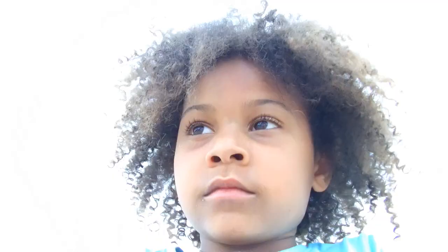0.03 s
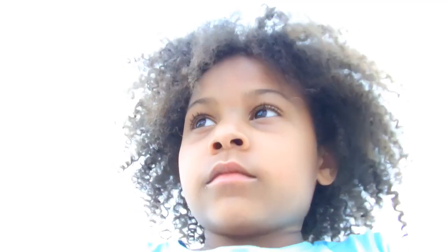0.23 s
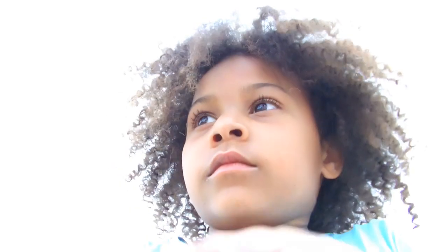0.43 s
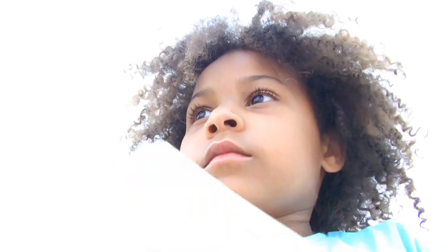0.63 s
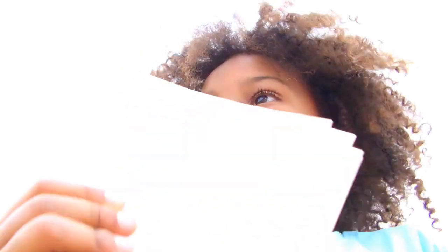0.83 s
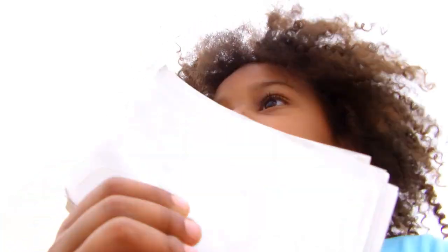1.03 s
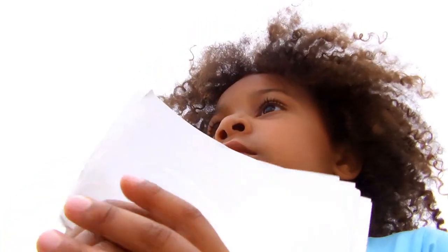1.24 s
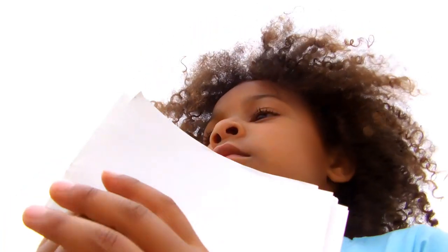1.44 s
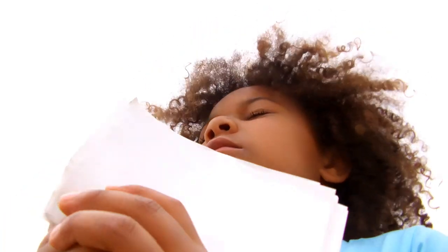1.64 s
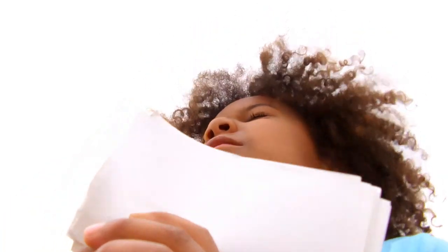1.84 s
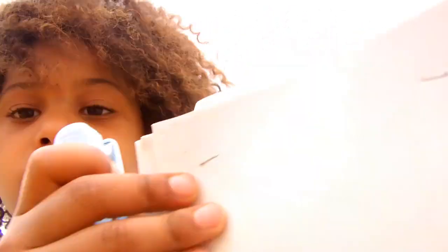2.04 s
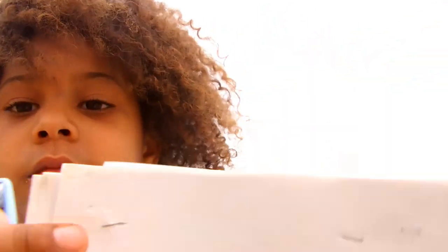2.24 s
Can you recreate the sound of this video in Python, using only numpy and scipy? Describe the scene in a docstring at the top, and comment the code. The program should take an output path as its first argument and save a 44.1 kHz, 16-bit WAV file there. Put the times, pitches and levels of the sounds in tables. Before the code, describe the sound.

The scene is outdoors with no echo, and a faint hum of far traffic runs throughout. Right at the start, a stack of paper flaps, crackles and knocks close to the microphone, then the sheets slide with a soft hiss that fades by about 1 second. A few very faint, thin bird whistles come between 0.5 and 1.5 seconds. At about 1.25 seconds there is a light knock on the stack with tiny paper ticks. At about 1.55 seconds a mini stapler is pressed once: a sharp, dry snap, the loudest sound, followed almost instantly by a smaller one as the staple folds. Another light knock comes near 1.75 seconds. From 2.1 seconds to the end, around 2.3 seconds, the sheets slide, tick and tap again, while soft, dull handling bumps and a low rumble reach the microphone, mostly on the left.

```python
"""Outdoors, with no walls to echo, far traffic hums and a few faint birds whistle.
Close to the microphone, sheets of paper flap, tick and slide under the fingers (buckling and
stick-slip friction), and handling bumps the casing. A mini stapler is pressed once through the stack:
a sharp snap as the staple pierces, then a smaller one as it folds. Each snap excites the damped
modes of the frame and of the stack, and tears paper fibres."""
import sys
import numpy as np
from scipy import signal
from scipy.fft import rfft, irfft, next_fast_len
from scipy.io import wavfile
from scipy.ndimage import uniform_filter1d

SR = 44100
rng = np.random.default_rng(int(sys.argv[2]) if len(sys.argv) > 2 else 0)


def unload_wav(signal):
    """Save mono or channel-first audio to the path in sys.argv[1] as 16-bit WAV at rate SR, clipped to [-1, 1]."""
    wavfile.write(
        sys.argv[1],
        SR,
        np.round(np.clip(np.atleast_2d(signal).T, -1, 1) * 32767).astype(np.int16),
    )


N = 105354
T = np.arange(N) / SR
HIT_T = T[:4096]  # time axis of one impact

# spectrum of far traffic: f/Hz, level/dB
TRAFFIC_SPECTRUM = [(15, -58), (25, -20.5), (55, -16), (262, -22), (343, -21.5), (417, -19), (471, -20),
                    (532, -16), (632, -13), (697, -8.5), (1010, -2.5), (2370, -19), (6000, -28.5),
                    (7480, -34), (8660, -53), (11300, -73), (19100, -120)]
# its stereo width: f/Hz, side minus mid level/dB
TRAFFIC_WIDTH = [(60, -14), (180, -12.5), (350, -3.5), (950, -14.5), (1600, -8.5), (2800, -3.5),
                 (6000, 0.5)]
# bird whistles: t/s, duration/s, level/dB is last, after start f/Hz and end f/Hz
WHISTLES = [(0.463, 0.12, 5080, 5080, -61), (0.861, 0.1, 2920, 2850, -57), (0.898, .09, 4120, 3960, -68.5),
            (1.359, 0.14, 1772, 1676, -56), (1.434, 0.084, 2920, 2880, -62.5)]
# fingers shifting on the casing: t/s, duration/s, level/dB, release t60/s
GRIP_MOVES = [(0, 0.085, -69, .1), (2.1, 0.15, -54, .3), (2.265, 0.026, -46, 0.45)]
# spectrum of their rumble: f/Hz, level/dB
GRIP_SPECTRUM = [(20, -21), (60, -0.5), (130, -1), (280, -4.5), (600, -19), (2000, -75)]
# soft bumps on the microphone: t/s, level/dB, f/Hz, t60/s, left minus right level/dB
CASING_BUMPS = [(0.214, -36.5, 120, 0.034, 0), (2.094, -39.5, 304, 0.025, 20), (2.12, -43, 238, 0.03, 16),
                (2.226, -34, 216, 0.028, 21.5), (2.292, -33, 148.5, 0.044, 24.5), (2.32, -41, 240, .03, 21)]
# sheets sliding on each other: t/s, duration/s, level/dB, release t60/s
SLIDE_MOVES = [(0, 0.011, -45, 0.18), (.045, 0.031, -49.5, 0.036), (.085, 0.039, -48, .05),
               (.14, 0.36, -57.5, 0.59), (.55, 0.039, -53, 0.053), (.69, 0.018, -61, 0.15),
               (.85, 0.04, -60.5, 0.26), (1.298, 0.0057, -49.5, 0.15), (1.775, 0.026, -54, 0.023),
               (2.097, 0.099, -38, 0.024), (2.276, 0.027, -42.5, 0.16)]
# spectrum of sliding: f/Hz, level/dB
SLIDE_SPECTRUM = [(100, -34.5), (400, -12), (800, -13.5), (1500, -8.5), (2300, -10), (3100, 1.5),
                  (4000, -4.5), (5000, -2.5), (6000, -7.5), (7000, -6.5), (8000, -24), (9000, -34.5)]
# the whole stack flexing: t/s, duration/s, level/dB, release t60/s
FLEX_MOVES = [(.053, 0.033, -34.5, 0.1), (2.125, 0.096, -53, 0.13), (2.282, 0.0082, -50, 0.16)]
# spectrum of flexing: f/Hz, level/dB
FLEX_SPECTRUM = [(40, -43), (120, -14), (300, -13), (680, 0), (1200, 6.5), (2000, 2), (2900, 0.5),
                 (4000, -7.5), (5500, -20), (7500, -49.5), (9000, -54)]
# sheets tapping and buckling: t/s, level/dB, centre f/Hz, t60/s
SHEET_TAPS = [(0.052, -27.5, 3600, 0.038), (.0556, -29, 2860, 0.016), (.058, -27, 835, 0.02),
              (0.0652, -22, 2000, 0.0079), (0.0803, -24, 2780, 0.007), (0.096, -48, 3000, 0.015),
              (0.1306, -36, 3060, 0.022), (.1457, -47.5, 4030, 0.023), (.165, -40.5, 4000, 0.012),
              (.180, -37.5, 4430, 0.0073), (1.258, -33, 1900, 0.0044), (1.2807, -40, 4320, .0078),
              (1.354, -42, 3260, 0.0078), (1.7645, -36.5, 1600, 0.04), (2.1218, -30, 4170, 0.021),
              (2.175, -32.5, 3200, 0.022), (2.1888, -32, 2800, 0.012), (2.192, -23.5, 4000, 0.0068),
              (2.2624, -19, 2830, 0.0047), (2.2756, -34.5, 3500, 0.0048), (2.2817, -35.5, 1400, 0.02)]
# response shared by all taps: f/Hz, gain/dB
TAP_RESPONSE = [(80, -40.5), (200, -33.5), (400, 3.5), (1000, 2), (4000, 0.5), (7000, 1), (7800, -6.5),
                (8600, -19.5)]
# fingers and stapler knocking the stack: t/s, level/dB, frequency ratio
STACK_KNOCKS = [(0.0571, -10.5, 0.75), (0.0721, -13, 0.93), (1.2557, -16, 1), (1.765, -18.5, 0.82),
                (2.2622, -18.5, 0.77), (2.284, -22, 0.89)]
# modes of the paper stack, a dead thud: f/Hz, t60/s, level/dB
THUD_MODES = [(801, .01, -19), (933, .0076, -19), (1284, .0018, 0)]
# modes of the stapler's steel and plastic: f/Hz, t60/s, level/dB
FRAME_MODES = [(2193, .0101, -19), (2630, .012, -24), (3431, .0077, -6), (3768, .0079, 0),
               (4429, .0111, -13), (4800, .011, -21), (5954, .018, -30), (6849, .0104, -24),
               (8061, .0068, -33)]
# spectrum of fibres tearing round the staple: f/Hz, level/dB
TEAR_SPECTRUM = [(100, -45), (400, -2), (1000, 1.5), (1700, -26), (2600, 9), (3300, 3.5), (5000, -5.5),
                 (7000, -3), (9000, -22)]
# radiation of a small body, weak in the bass: f/Hz, gain/dB
SMALL_BODY_RADIATION = [(60, -46), (180, -28), (300, -10), (500, -2), (800, 0), (4200, 0), (5000, 1),
                        (7200, 0), (8000, -6), (9000, -16)]
# the staple piercing, then folding: t/s, thud level/dB, thud frequency ratio, frame frequency ratio,
# contacts as (t/s relative to the thud, ring level/dB)
STAPLE_SNAPS = [(1.53795, 5.2, 1.5, .975, [(-.00106, -12), (0, -1.4), (.00063, -13.4), (.00508, -22)]),
                (1.56820, 1, 1.1, 1.102, [(-.002, -19.5), (0, -13.5), (.00103, -11.7), (.00423, -26)])]


def undb(db):
    """Amplitude ratio from a logarithmic level."""
    return 10 ** (np.asarray(db) / 20)


def unit(x):
    """Normalisation to rms 1."""
    return x / np.sqrt(np.mean(x ** 2))


def decay(t60):
    """Exponential damping: 60 dB down in t60 seconds."""
    return np.exp(-np.log(1000) * HIT_T / t60)


def add(track, start, sound):
    """Superposition of a sound on the track from a start time in seconds."""
    i = int(round(start * SR))
    track[..., i:i + sound.shape[-1]] += sound[..., :N - i]


def wander(rate_hz):
    """Smoothed Gaussian noise: a random drift of rms 1."""
    hold = int(SR / rate_hz)
    steps = np.repeat(rng.standard_normal(N // hold + 1), hold)
    return unit(uniform_filter1d(steps, hold)[:N])


def colour(x, spectrum):
    """Minimum-phase filtering through (f/Hz, gain/dB) points."""
    size = 2 * next_fast_len(len(x))
    hz, db = np.transpose(spectrum)
    gain = undb(np.interp(np.log(np.fft.rfftfreq(size, 1 / SR) + 1), np.log(hz), db))
    cepstrum = irfft(np.log(gain))
    cepstrum[1:size // 2] *= 2  # folding the cepstrum makes the filter causal
    cepstrum[size // 2 + 1:] = 0
    return irfft(rfft(x, size) * np.exp(rfft(cepstrum)))[:len(x)]


def noise(spectrum, samples=N):
    """Spectral shaping of white noise, at rms 1."""
    return unit(colour(rng.standard_normal(samples), spectrum))


def ports(x, lag_us):
    """Path difference: sound from one side reaches the right microphone port later."""
    delay = np.exp(-2j * np.pi * np.fft.rfftfreq(N, 1 / SR) * lag_us * 1e-6)
    return np.array([x, irfft(rfft(x) * delay, N)])


def ring(modes, rise_s, pitch=1):
    """Free vibration: a sum of damped modes after a short push."""
    tone = sum(undb(db) * decay(t60) * np.sin(2 * np.pi * hz * pitch * HIT_T) for hz, t60, db in modes)
    return tone * (1 - np.exp(-HIT_T / rise_s))


def swell(moves, build_db, attack_s=0.001):
    """Incoherent addition: hand movements take hold, gather force and die away, summing in power."""
    power = np.zeros(N)
    for start, length, db, t60 in moves:
        attack = np.clip((T - start) / attack_s, 0, 1)
        build = undb(build_db * np.clip((T - start) / length - 1, -1, 0))
        release = np.exp(-np.log(1000) * np.maximum(T - start - length, 0) / t60)
        power += (undb(db) * attack * build * release) ** 2
    return np.sqrt(power)


def traffic(level_db=-51):
    """Broadband noise of far tyres; lower coherence between channels widens the treble."""
    mid = noise(TRAFFIC_SPECTRUM)
    side = colour(noise(TRAFFIC_SPECTRUM), TRAFFIC_WIDTH)
    return undb(level_db + 0.15 * wander(rate_hz=22)) * np.array([mid + side, mid - side])


def birds():
    """Random modulation of pitch and level blurs thin, distant whistles."""
    out = np.zeros(N)
    for start, length, start_hz, end_hz, db in WHISTLES:
        progress = np.clip((T - start) / length, 0, 1)
        hz = start_hz + (end_hz - start_hz) * progress + 40 * wander(rate_hz=580)
        envelope = undb(db + 4 * wander(rate_hz=170)) * np.sin(np.pi * progress)
        out += envelope * np.sin(2 * np.pi * np.cumsum(hz) / SR)
    return ports(out, lag_us=0)


def handling():
    """Structure-borne sound: rumble and dull bumps cross the casing, mostly to the left port."""
    rumble = np.array([undb(db) * noise(GRIP_SPECTRUM) for db in (0, -9)])
    out = swell(GRIP_MOVES, build_db=3.5) * rumble
    for start, db, hz, t60, pan_db in CASING_BUMPS:
        gains = undb([db + pan_db / 2, db - pan_db / 2])
        add(out, start, np.outer(gains, ring([(hz, t60, 0)], rise_s=0.0068)))
    return out


def friction(spectrum, grain_db, patchy_db, slips_per_s):
    """Stick-slip: fibres catch and let go in dense, uneven impulses that come in patches."""
    slips = (rng.random(N) < slips_per_s / SR) * rng.standard_normal(N)
    sizes = undb(grain_db * np.minimum(rng.exponential(size=N), 4))
    patches = undb(patchy_db * wander(rate_hz=240))
    return unit(colour(slips * sizes * patches, spectrum))


def paper_rustle():
    """Friction noise: sliding sheets hiss brightly; the bending stack crumples lower down."""
    hiss = friction(SLIDE_SPECTRUM, grain_db=-1.5, patchy_db=-0.5, slips_per_s=11000)
    crumple = friction(FLEX_SPECTRUM, grain_db=1.5, patchy_db=1.4, slips_per_s=9000)
    slide = swell(SLIDE_MOVES, build_db=5) * hiss
    flex = swell(FLEX_MOVES, build_db=1) * crumple
    return ports(slide, lag_us=1.5) + ports(flex, lag_us=3.7)


def crackle(hz, width_hz, t60, rise_s=0.00017):
    """Buckling: a burst of fibre noise drives the resonance of a patch of the sheet."""
    envelope = decay(t60)
    burst = rng.standard_normal(len(HIT_T)) * envelope * (1 - np.exp(-HIT_T / rise_s))
    peak = signal.iirpeak(hz, hz / width_hz, fs=SR)
    patch = signal.lfilter(*peak, signal.lfilter(*peak, burst))  # twice, for steep skirts
    return unit(patch) * np.sqrt(np.mean(envelope ** 2))


def paper_taps():
    """Damping sets bandwidth: taps ring broad, dead resonances; a catching edge rings a narrow one."""
    out = np.zeros(N)
    for start, db, hz, t60 in SHEET_TAPS:
        add(out, start, undb(db) * crackle(hz, width_hz=1.21 * hz, t60=t60))
    squeak = undb(-27.5) * crackle(hz=6140, width_hz=790, t60=0.015)
    add(out, start=2.153, sound=squeak)
    return ports(colour(out, TAP_RESPONSE), lag_us=18)


def stack_knocks():
    """Impact excitation: light knocks thud the stack's modes; a looser hold sounds lower."""
    out = np.zeros(N)
    for start, db, pitch in STACK_KNOCKS:
        add(out, start, undb(db) * ring(THUD_MODES, rise_s=0.00014, pitch=pitch))
    return ports(colour(out, SMALL_BODY_RADIATION), lag_us=8)


def stapler(tear_db=-27, tear_db_per_ring_db=0.17):
    """Modal excitation: each snap thuds the stack as rapid contacts ring the frame and tear fibres."""
    out = np.zeros(N)
    for start, thud_db, thud_pitch, frame_pitch, contacts in STAPLE_SNAPS:
        add(out, start, undb(thud_db) * ring(THUD_MODES, rise_s=0.0003, pitch=thud_pitch))
        # the hand damps the frame; the load on the jaw changes its stiffness, and so its pitch
        frame = ring(FRAME_MODES, rise_s=0.00015, pitch=frame_pitch)
        for offset, ring_db in contacts:
            tear = noise(TEAR_SPECTRUM, len(HIT_T)) * decay(t60=0.014)
            tear_gain = undb(tear_db + tear_db_per_ring_db * ring_db)
            add(out, start + offset, undb(ring_db) * frame + tear_gain * tear)
    return ports(colour(out, SMALL_BODY_RADIATION), lag_us=15.4)


def scene():
    """Free-field superposition: the direct sounds add at the microphone."""
    return stapler() + stack_knocks() + paper_taps() + paper_rustle() + handling() + birds() + traffic()


def record(dry):
    """Band limiting: the recorder's elliptic low-pass cuts the top steeply."""
    cutoff_hz = 8800
    return signal.sosfilt(signal.ellip(8, 0.2, 70, cutoff_hz, fs=SR, output="sos"), dry)


dry = scene()
out = record(dry)
unload_wav(out)
```